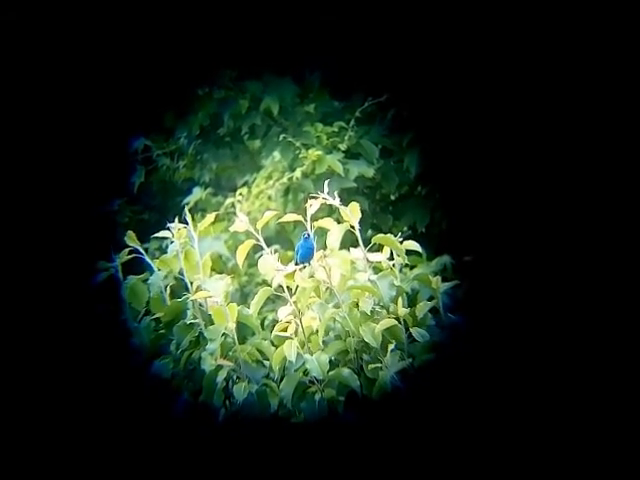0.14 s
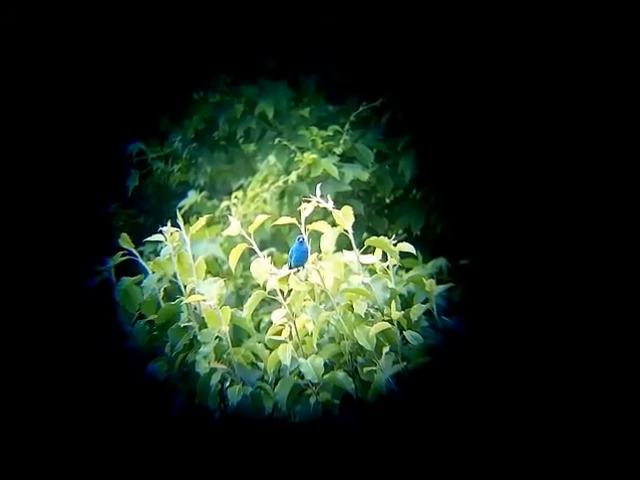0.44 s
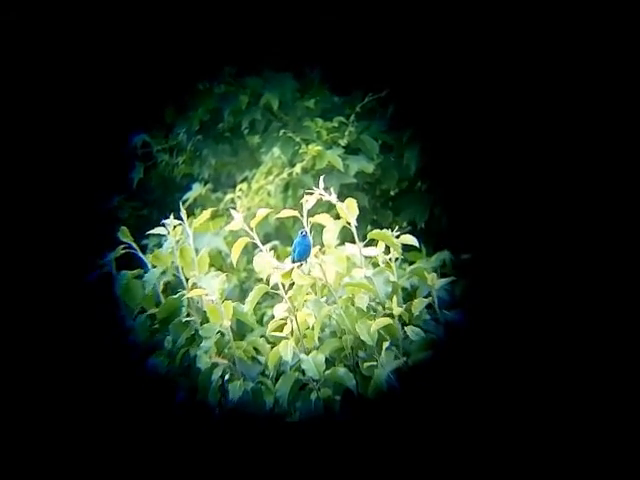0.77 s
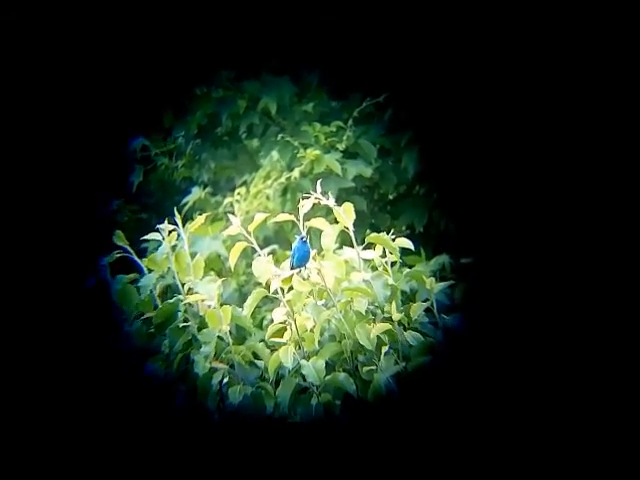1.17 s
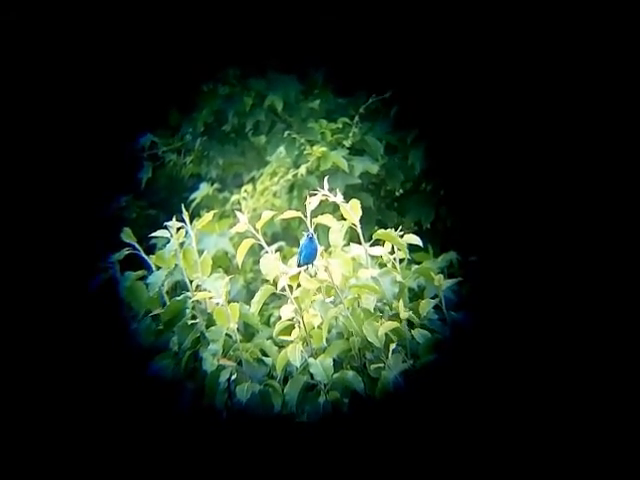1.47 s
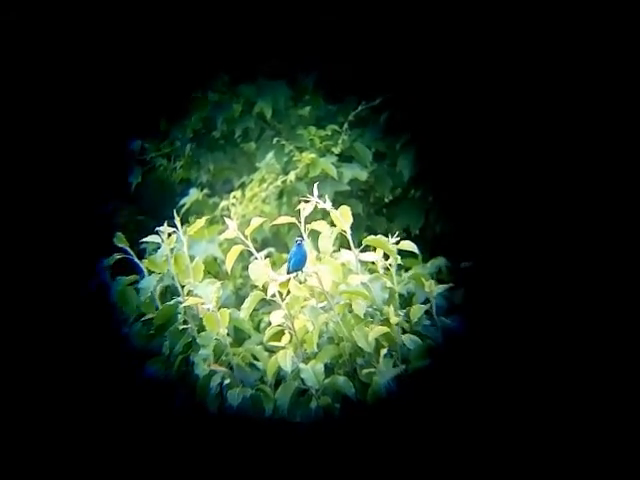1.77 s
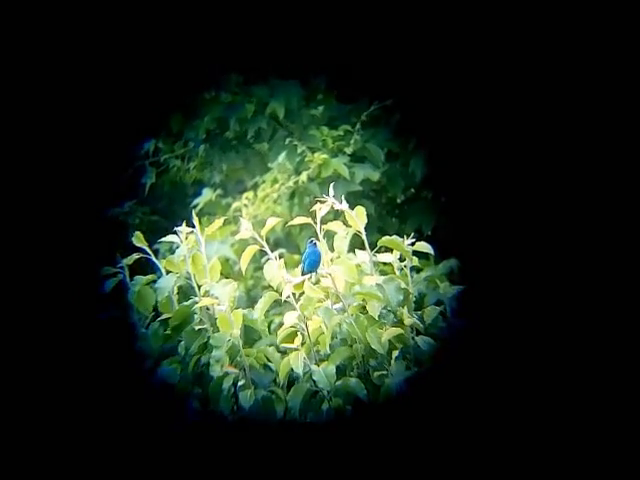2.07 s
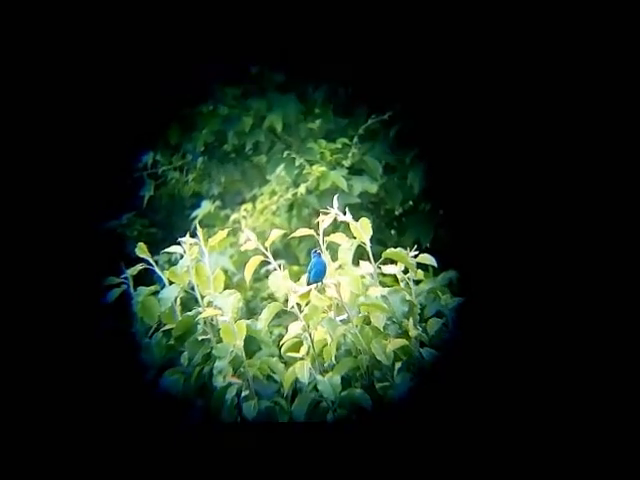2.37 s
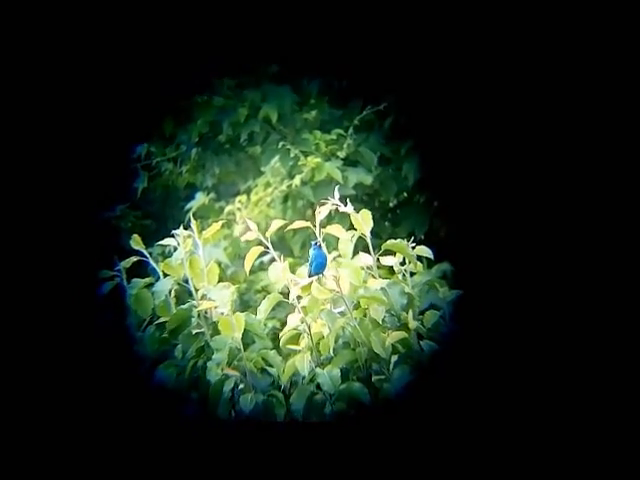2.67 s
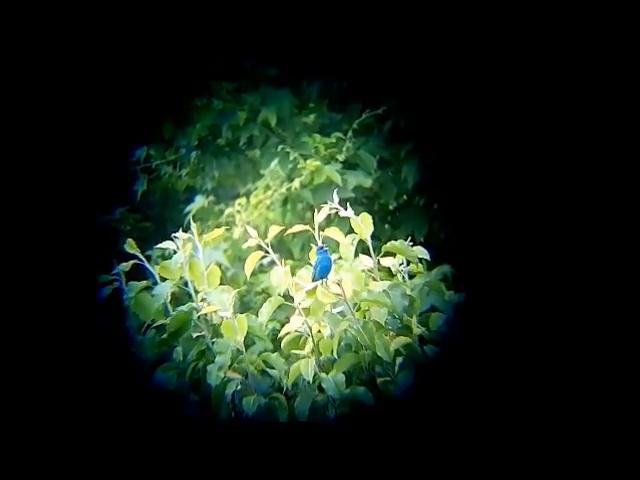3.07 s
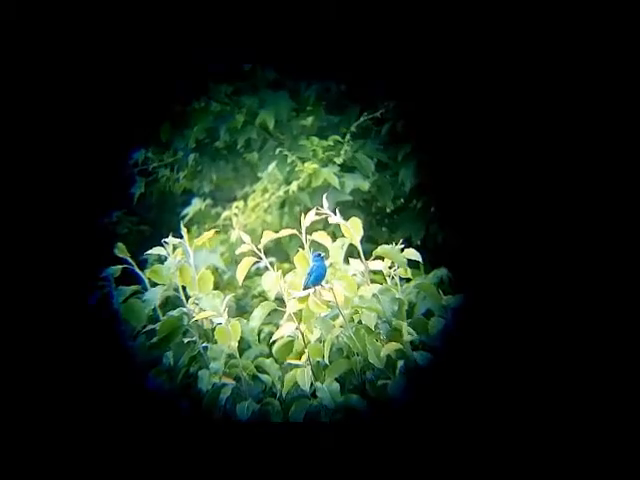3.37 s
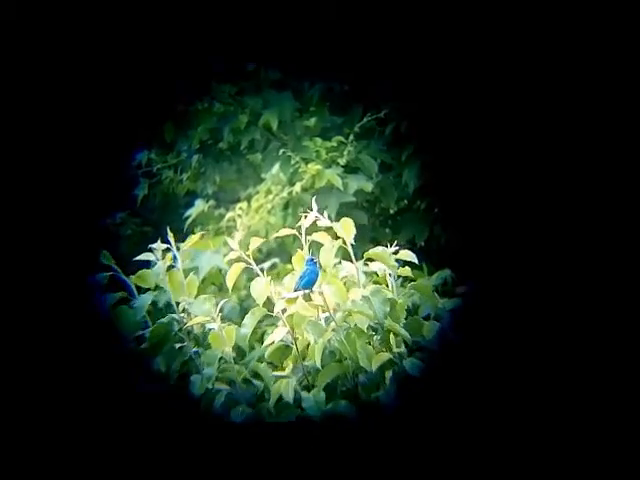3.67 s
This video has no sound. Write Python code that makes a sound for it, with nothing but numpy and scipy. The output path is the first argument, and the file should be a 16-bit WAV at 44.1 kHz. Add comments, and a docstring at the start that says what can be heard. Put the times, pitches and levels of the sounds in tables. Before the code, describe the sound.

A small songbird on the right sings short high gliding whistles in the second half, after wind rumble, leaf hiss and faint insect ticks; outdoors among foliage, with wind buffeting and handling knocks on the microphone.

```python
"""A low drone, as of a far engine, under wind rumble and buffets on the microphone; leaves hiss.
An insect ticks, dry handling knocks follow; then a small songbird on the right whistles gliding notes,
with faint thin peeps among them and one sharp click.
Wind and leaves are banded noise, drone, whine and whistles are sines on moving pitches;
ticks and knocks are bursts of band-passed noise, and the click is a decaying step."""
import sys
import numpy as np
from scipy import signal
from scipy.io import wavfile
from scipy.ndimage import uniform_filter1d

SR = 44100
rng = np.random.default_rng(int(sys.argv[2]) if len(sys.argv) > 2 else 0)


def bounce(signal):
    """Save signal as a 16-bit WAV file at the path given by the first command-line argument."""
    frames = np.transpose(np.atleast_2d(signal))
    limited = np.clip(frames, -1, 1)
    pcm = np.round(limited * 32767).astype(np.int16)
    wavfile.write(sys.argv[1], SR, pcm)


N = 168462
T = np.arange(N) / SR


def from_db(db):
    """Decibels to amplitude gain."""
    return 10 ** (np.asarray(db) / 20)


def rms_one(x):
    """Scale to unit rms."""
    return x / np.sqrt(np.mean(x ** 2) + 1e-20)


def level_curve(rows):
    """Gain over time from (time [s], level [dB]) rows."""
    return from_db(np.interp(T, *np.transpose(rows)))


def at_hz(points, hz):
    """Read a table on a log-frequency axis."""
    table_hz, values = np.transpose(points)
    return np.interp(np.log(hz), np.log(table_hz), values)


def drift(corner_hz):
    """Unit-rms random drift: noise through a two-pole low-pass at SR / 20, interpolated to SR."""
    pole = np.exp(-40 * np.pi * corner_hz / SR)
    noise = rng.standard_normal(N // 20 + 2002)
    slow = signal.lfilter([1], [1, -2 * pole, pole * pole], noise)[2000:]  # drop the filter's start-up
    return np.interp(np.arange(N) / 20, np.arange(len(slow)), rms_one(slow))


def band(x, low_hz, high_hz):
    """Butterworth band-pass."""
    edges_hz = [low_hz, min(high_hz, .45 * SR)]
    return signal.sosfilt(signal.butter(2, edges_hz, "band", fs=SR, output="sos"), x)


def low_pass(x, edge_hz):
    """Steep elliptic low-pass."""
    return signal.sosfilt(signal.ellip(10, .2, 80, edge_hz, fs=SR, output="sos"), x)


def bump(centre_s, width_s):
    """Gaussian envelope, peak 1."""
    return np.exp(-((T - centre_s) / width_s) ** 2)


def decay(start_s, decay_s):
    """Step to 1 that dies away exponentially."""
    return (T >= start_s) * np.exp(-np.abs(T - start_s) / decay_s)


def evened(x, size):
    """Hold the power steady over a window of size samples."""
    return x / np.sqrt(uniform_filter1d(np.mean(x ** 2, axis=0), size) + 1e-12)


def from_right(x, left_db):
    """Place a sound to the right by weakening the left side."""
    return np.array([from_db(left_db) * x, x])


def banded_noise(spectrum, likeness, pan, patchy_db):
    """Half-octave bands of stereo noise, each with own level, flicker, correlation and balance; rms 1."""
    edges_hz = 20 * 2 ** np.arange(0, 9.1, .5)
    sides = np.array([[1], [-1]])
    white = rng.standard_normal((2, 2, N))  # neighbouring bands take different noise
    out = 0
    for k, (low_hz, high_hz) in enumerate(zip(edges_hz, edges_hz[1:])):
        if high_hz < spectrum[0][0] or low_hz > spectrum[-1][0]:
            continue
        hz = np.sqrt(low_hz * high_hz)
        narrow = band(white[k % 2], low_hz, high_hz)
        mid, side = band(narrow, low_hz / 2, high_hz * np.sqrt(2))
        alike = np.clip(at_hz(likeness, hz), -1, 1)
        gain = from_db(at_hz(spectrum, hz) + patchy_db * drift(11))
        balance = from_db(sides * at_hz(pan, hz) / 2)
        out = out + gain * balance * (np.sqrt(1 + alike) * mid + np.sqrt(1 - alike) * side * sides)
    return rms_one(out)


def whistle(hz, gain, start_s, length_s, fade_s=0.0028):
    """Sine on a moving pitch, from accumulated phase; the fades lie outside its length."""
    gate = np.clip(np.minimum(T - start_s, start_s + length_s - T) / fade_s + 1, 0, 1)
    return gate * gain * np.sin(2 * np.pi * np.cumsum(hz) / SR)


def wind():
    """Wind on the microphone: lumpy low noise, a softer rush above, and short buffets reaching higher."""
    # spectra: (frequency [Hz], relative density [dB per Hz])
    rumble_spectrum = [(22, -27), (40, -11), (60, 0.04), (85, 2), (160, -5), (250, -18), (400, -40)]
    rush_spectrum = [(260, -2.5), (400, -3.5), (540, -12.5), (750, -22), (1100, -32)]
    buffet_spectrum = [(40, -5), (100, 20), (200, 3.5), (330, -11), (600, -27.5), (1100, -52)]
    # (time [s], level [dB])
    rumble_level = [(0, -24), (1.55, -21), (2.05, -22), (3.82, -23.5)]
    rush_level = [(.2, -50.5), (.36, -43), (.55, -50.5), (.82, -47), (1.7, -47), (1.95, -47.5), (2.88, -48),
                  (3.04, -43), (3.4, -50)]
    # buffet peaks: (time [s], level [dB])
    buffet_peaks = [(.475, -18), (0.81, -18), (1.039, -15), (1.097, -16.5), (1.647, -10.5), (2.405, -16.5),
                    (2.442, -13), (2.46, -14.5), (2.578, -14), (2.961, -21.5), (2.984, -14), (3.105, -18),
                    (3.33, -18), (3.553, -16), (3.727, -15), (3.8, -10)]
    # channel correlation: (frequency [Hz], correlation [0-1])
    likeness = [(230, 1), (460, 0.82), (900, 0.28)]
    # balance: (frequency [Hz], left minus right [dB])
    pan = [(60, 3), (200, 0.81), (600, 3)]
    lumps_db, buffet_width_s = 1.5, .012

    lumps = rms_one(from_db(lumps_db * drift(43)))
    rumble_noise = evened(banded_noise(rumble_spectrum, likeness, pan, patchy_db=1.5), size=4000)
    rumble = level_curve(rumble_level) * rumble_noise
    rush = level_curve(rush_level) * banded_noise(rush_spectrum, likeness, pan, patchy_db=2.0)
    buffets = sum(from_db(db) * bump(s, buffet_width_s) for s, db in buffet_peaks)
    buffet_noise = evened(banded_noise(buffet_spectrum, likeness, pan, patchy_db=0), size=900)
    return lumps * (rumble + rush) + buffets * buffet_noise


def drone():
    """Low sine that swells, fades and flutters in the moving air, under a faint sine whine of unsteady pitch."""
    # (time [s], level [dB])
    drone_level = [(0, -25.5), (1.0, -27), (1.3, -18), (1.6, -19), (1.72, -23.5), (2.66, -25),
                   (2.85, -18.5), (3.3, -26)]
    whine_level = [(0, -62.5), (.38, -53), (1.6, -67)]
    drone_hz, whine_hz = 105.85, 551
    wander, flutter_db = .015, 2.5  # rms share of the pitch, rms level

    drone_phase = 2 * np.pi * np.cumsum(drone_hz * (1 + wander * drift(3.39))) / SR
    whine_phase = 2 * np.pi * np.cumsum(whine_hz * (1 + wander * drift(20))) / SR
    low_tone = rms_one(from_db(flutter_db * drift(12)) * np.sin(drone_phase))
    return level_curve(drone_level) * low_tone + level_curve(whine_level) * np.sin(whine_phase)


def leaves():
    """Leaf hiss: flickering banded noise on a slow level curve."""
    # (frequency [Hz], relative density [dB per Hz])
    spectrum = [(800, -6), (1500, 10), (2500, 5.5), (3600, 13), (6400, 7), (7500, -7)]
    # (time [s], level [dB])
    hiss_level = [(.2, -60.5), (.85, -56.5), (1.2, -58.5), (1.65, -56), (1.95, -58), (2.5, -60),
                  (3.3, -57.5), (3.82, -59)]
    # balance: (frequency [Hz], left minus right [dB])
    pan = [(1000, 10.5), (1800, -3.5), (3500, -6.5)]
    likeness = [(1800, 0.7), (3600, 0.84), (7000, -0.9)]  # (frequency [Hz], channel correlation [-1 to 1])
    return level_curve(hiss_level) * banded_noise(spectrum, likeness, pan, patchy_db=1.63)


def insect():
    """Uneven run of short high ticks, a few stronger: Gaussian bursts of band-passed noise."""
    # strong ticks: (time [s], level [dB])
    strong_ticks = [(1.111, -53.5), (1.506, -51), (1.760, -54)]
    first_s, last_s = .4, 2.05
    gap_s, tick_width_s = .04, .004  # median gap
    centre_hz, width_hz, weak_db = 6400, 1000, -58.5

    times_s = first_s + np.cumsum(gap_s * np.exp(.3 * rng.standard_normal(60)))
    ticks = strong_ticks + [(s, weak_db) for s in times_s if s < last_s]
    bursts = sum(from_db(db) * bump(s, tick_width_s) for s, db in ticks)
    ring = rms_one(band(rng.standard_normal(N), centre_hz - width_hz / 2, centre_hz + width_hz / 2))
    return from_right(bursts * ring, left_db=-30)


def handling():
    """Small dry handling knocks and ticks: decaying noise, each ringing in its own band."""
    # (time [s], peak level [dB], nominal band frequency [Hz])
    knocks = [(1.225, -40, 720), (1.649, -37, 680), (2.274, -45, 4350), (2.640, -43, 4300),
              (2.673, -33, 680), (2.723, -42, 560), (2.799, -45, 2000)]
    out, noise = 0, rng.standard_normal(N)
    for s, peak_db, hz in knocks:
        knock = band(noise * decay(s, decay_s=.003) + 1e-18, hz / 1.46, hz * 1.25)
        out = out + from_db(peak_db) * knock / np.max(np.abs(knock))
    return out


def rustle():
    """Brief brushing close by: one Gaussian swell of band-passed stereo noise."""
    brush = rms_one(band(rng.standard_normal((2, N)), 2800, 5600))
    return from_db(-54.5) * bump(centre_s=2.1, width_s=.084) * brush


def songbird():
    """Pure whistled syllables, gliding and wavering; near-leaf reflections beat against them."""
    # syllable name: (time from its start [s], pitch [Hz], level before gain [dB])
    syllables = { "slur": [(0, 6100, -53.5), (.006, 5350, -52.5), (.022, 4750, -47), (.036, 4100, -49),
                 (.045, 3320, -60)], "flat": [(0, 4000, -50), (.009, 5480, -45), (.058, 5510, -40),
                 (.069, 5150, -49)], "arch": [(0, 4000, -53), (.007, 4170, -40), (.014, 4730, -33),
                 (.022, 5080, -40), (.029, 4700, -35), (.036, 3850, -40), (.044, 3400, -56)],
                 "sweep": [(0, 5200, -54.5), (.007, 5270, -39.5), (.02, 6250, -46), (.029, 6640, -54.5),
                 (.039, 6710, -54.5), (.056, 6480, -50), (.071, 5870, -43.5), (.084, 5620, -57.5),
                 (.092, 5350, -44.5)], "hook": [(0, 5620, -58), (.006, 4610, -59.5), (.017, 4280, -54.5),
                 (.024, 4250, -58)], "lift": [(0, 2950, -71), (.013, 3770, -37.5), (.026, 4120, -45.5),
                 (.039, 3800, -52)], "rise": [(0, 4450, -48), (.006, 5440, -33), (.018, 6030, -43),
                 (.03, 6420, -41), (.038, 6950, -64)], "sag": [(0, 3310, -60), (.052, 2630, -61.5),
                 (.09, 2900, -58)], "bow": [(0, 3160, -55), (.02, 3700, -53.5), (.037, 4285, -53.5),
                 (.052, 4560, -53), (.072, 4700, -51.5), (.092, 4400, -56.5), (.109, 4020, -59)],
                 "fall": [(0, 4920, -62), (.035, 4050, -50.5), (.048, 3730, -53), (.07, 3380, -56)], }
    # (start [s], syllable name, gain [dB], left side relative to right [dB])
    song = [(2.377, "slur", -1, -10.5), (2.441, "flat", -7.5, -19), (2.679, "arch", -3.5, -14),
            (2.883, "arch", -1.5, -13), (3.03, "sweep", 2, -15.5), (3.118, "hook", 13.5, -11.5),
            (3.152, "lift", -1, -9.5), (3.268, "sweep", 2, -17), (3.356, "hook", 13, -12),
            (3.508, "rise", -1.5, -20), (3.549, "sag", -4, -1), (3.649, "bow", 5, -10),
            (3.657, "fall", 0, -7)]
    # (delay [s], level relative to the note [dB])
    reflections = [(.0031, -12), (.0074, -15), (.024, -18)]
    waver_hz = 120  # corner of the random waver and flutter
    waver = 1 + .006 * drift(waver_hz)
    flutter_db = 2.2 * drift(waver_hz)

    out = 0
    for start_s, name, gain_db, left_db in song:
        s, hz, db = np.transpose(syllables[name])
        pitch_hz = uniform_filter1d(np.interp(T - start_s, s, hz), size=200) * waver
        gain = from_db(np.interp(T - start_s, s, db) + gain_db + flutter_db)
        note = whistle(pitch_hz, gain, start_s, s[-1])
        echoes = sum(from_db(loss_db) * np.interp(T - delay_s, T, note) for delay_s, loss_db in reflections)
        out = out + from_right(note + echoes, left_db)
    return out


def foliage(x):
    """Scatter from leaves and trunks: the right channel convolved with two decaying noise tails."""
    t60_s, echo_db, left_db = 1.2, -16.5, -2.5
    tails = rng.standard_normal((2, SR)) * from_db(-60 * T[:SR] / t60_s)
    tails /= np.sqrt(np.sum(tails ** 2, axis=1, keepdims=True))
    scattered = signal.fftconvolve(x[1:], tails, axes=1)[:, :N]
    return from_db(echo_db) * from_db([[left_db], [0]]) * scattered


def peeps():
    """Thin, nearly level sine notes that swell and fade."""
    # (start [s], length [s], starting pitch [Hz], glide [Hz], peak level [dB])
    peep_notes = [(2.607, 0.025, 7170, 200.5, -57.5), (2.647, 0.045, 4020, -75, -48.5),
                  (2.814, 0.028, 7290, -30.5, -56.5), (3.551, 0.052, 5330, 224, -52)]
    out = 0
    for start_s, length_s, hz, glide_hz, db in peep_notes:
        part = np.clip((T - start_s) / length_s, 0, 1)
        swell = np.sqrt(np.abs(np.sin(np.pi * part)))
        out = out + whistle(hz + glide_hz * part, from_db(db) * swell, start_s, length_s)
    return from_right(out, left_db=-12.5)


def click():
    """One sharp click: a step that decays exponentially."""
    return from_db(-15) * decay(start_s=3.387, decay_s=.002)


def scene():
    """All layers low-passed together; the click alone bypasses this treble edge."""
    background = wind() + drone() + leaves() + insect() + handling() + rustle()
    birds = songbird() + peeps()
    outdoors = background + birds + foliage(birds)
    return low_pass(outdoors, edge_hz=7505) + click()


def record(dry):
    """Cut the top treble."""
    return low_pass(dry, edge_hz=16500)


dry = scene()
out = record(dry)
bounce(out)
```